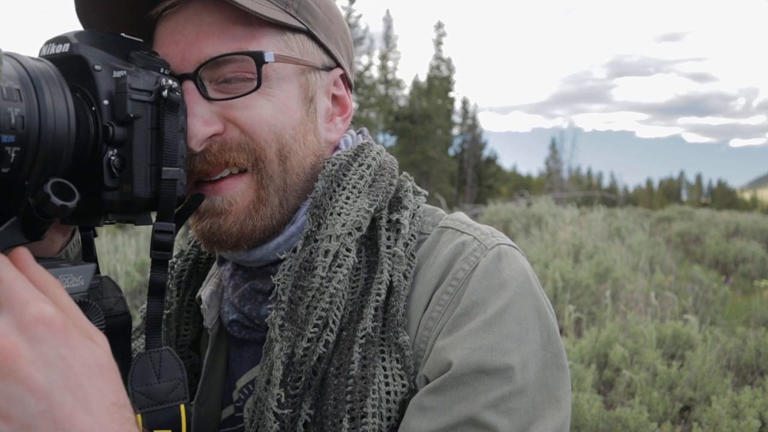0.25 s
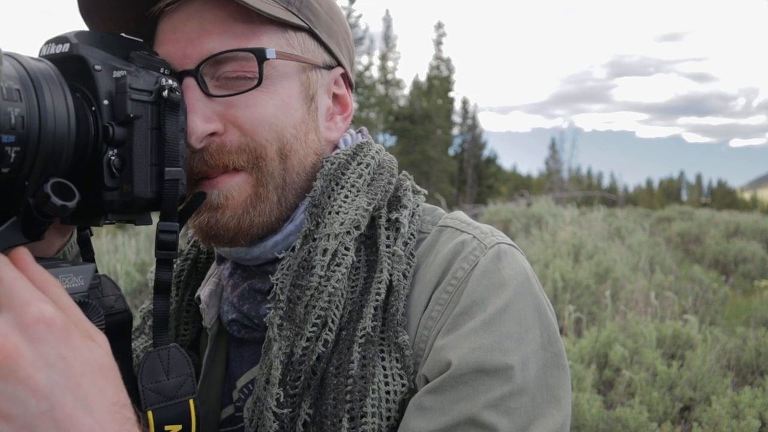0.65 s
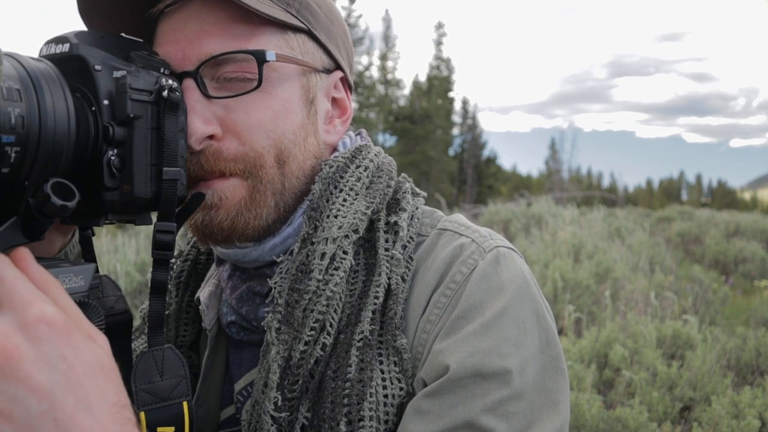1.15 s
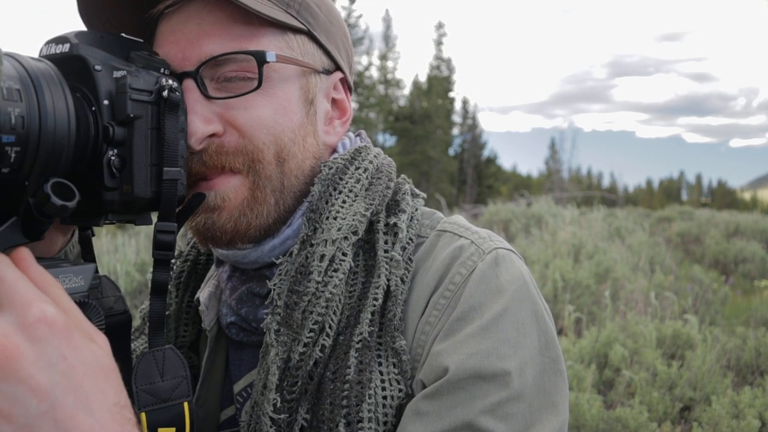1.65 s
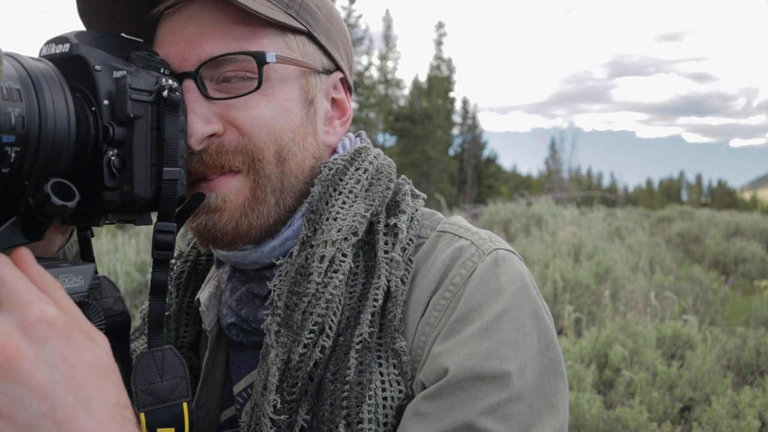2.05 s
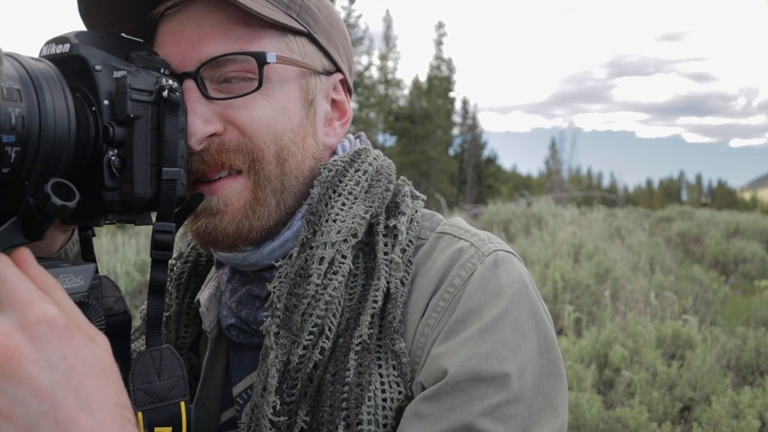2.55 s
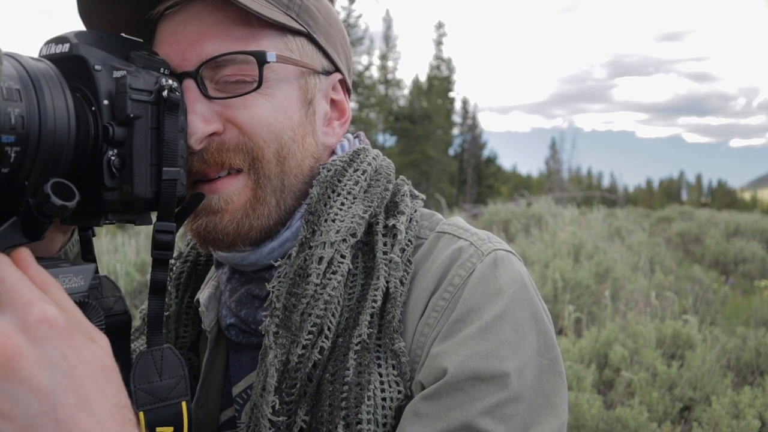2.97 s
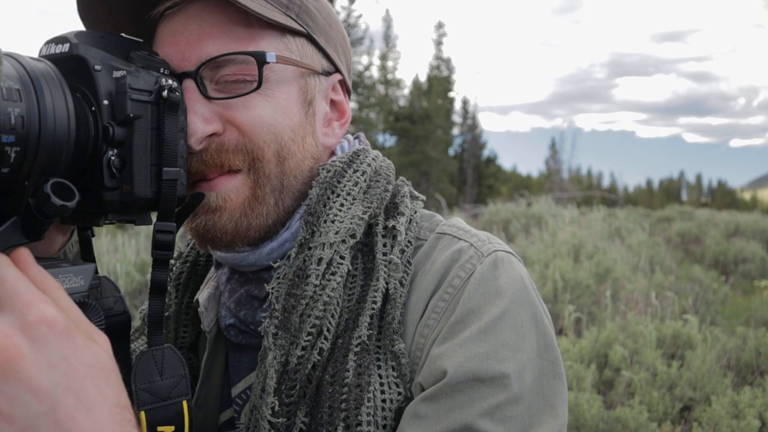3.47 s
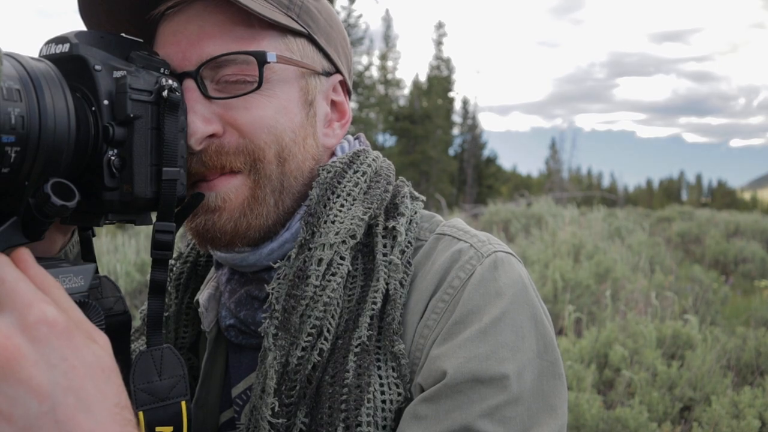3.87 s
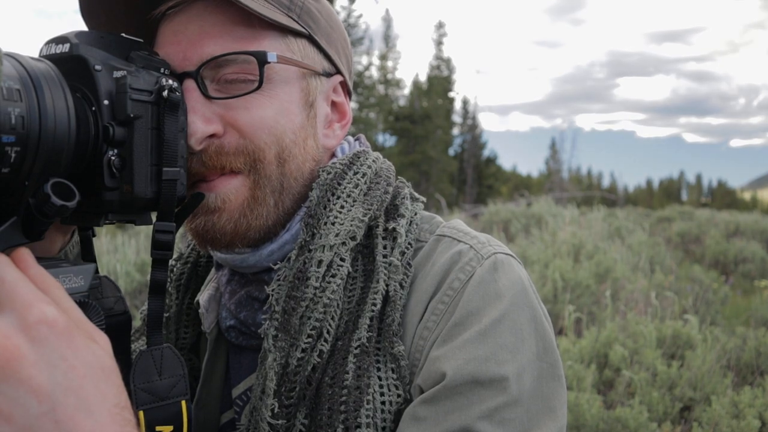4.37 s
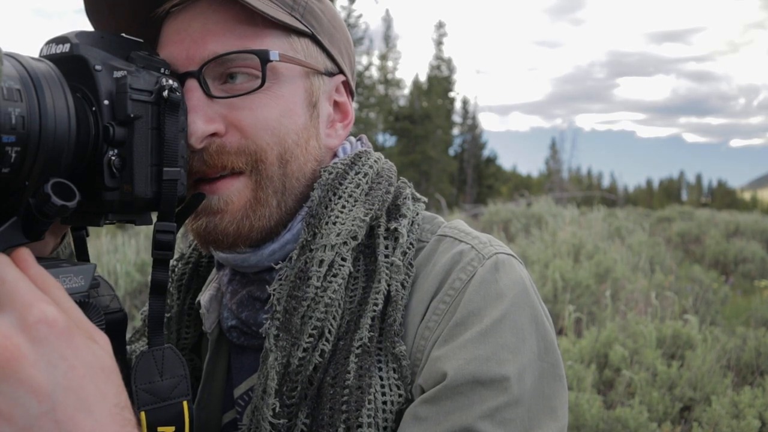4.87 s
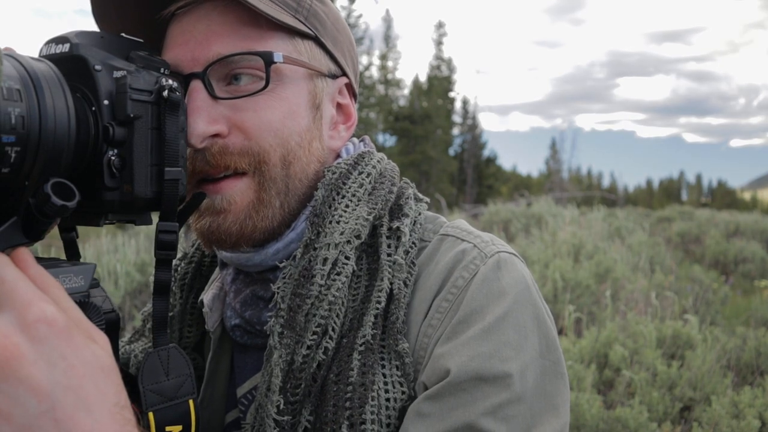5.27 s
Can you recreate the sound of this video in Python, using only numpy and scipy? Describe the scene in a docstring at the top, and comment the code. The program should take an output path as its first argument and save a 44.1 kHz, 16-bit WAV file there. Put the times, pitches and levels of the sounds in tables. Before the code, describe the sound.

Five sharp shutter actuations dominate: a pair at the very start, the first already under way, a pair just before and after two seconds, and a single near three and a half. Between them a few tiny grip ticks, faint bird trills, whistles and buzzing notes, and low far traffic that slowly recedes. Dry, close, centred mono pickup outdoors with no room echo.

```python
"""A reflex camera close by in an open meadow starts mid-frame, then fires at once, twice more, and once again.
In each frame the mirror swings up, the curtains slap across, a motor winds and the mirror drops: bursts of
tiny impacts through resonances. Small birds, sung as bending sines, go from trills through twitter, pips
and whistles to long buzzes. Filtered noise and sine drones make the far traffic throughout, over a faint
even hiss. Both channels carry the same signal."""
import sys
import numpy as np
from scipy import signal
from scipy.fft import rfft, irfft
from scipy.io import wavfile
from scipy.ndimage import uniform_filter1d

SR = 44100
rng = np.random.default_rng(int(sys.argv[2]) if len(sys.argv) > 2 else 0)


def digitize_waveform(pressure):
    """Quantize a signal to 16-bit integers and store it at the path in sys.argv[1].

    Rows of a 2-D input are taken as channels; values are limited to [-1, 1].
    """
    field = np.atleast_2d(pressure).T
    bounded = np.clip(field, -1, 1)
    quanta = np.round(bounded * 32767).astype(np.int16)
    wavfile.write(sys.argv[1], SR, quanta)


N = 243431
TIME = np.arange(N) / SR

# Stages of a frame in order. Each entry: stage name, share of its rattle energy that repeats every frame (0-1).
STAGE_REPEAT = {"mirror up": .5, "aperture": .3, "exposure": .98, "motor": .3, "mirror down": .4, "bounce":
                .3, "settle": .3, "lever": .4, "latch": .4}
# Resonances of the shutter frame, excited by the curtains only.
# Each row: centre in Hz, width in Hz, lift in dB.
SHUTTER_MODES = [(505, 80, 5.5), (1052, 65, 3.8), (1388, 50, 7), (1610, 80, 3), (1715, 80, 4),
                 (2065, 80, 8), (2235, 80, 4), (2530, 90, 4.5), (3128, 80, 5), (3316, 80, 6),
                 (3750, 110, 3), (4122, 100, 3), (4650, 80, 5), (5470, 100, 4), (7700, 120, 4),
                 (7990, 130, 3), (8410, 150, 4), (9140, 150, 4), (13470, 250, 5)]


def from_db(db):
    """Decibels to amplitude ratio."""
    return 10 ** (np.asarray(db) / 20)


def rms_one(x):
    """Scales a signal to rms 1."""
    return x / np.sqrt(np.mean(x ** 2) + 1e-20)


def add(track, s, sound):
    """Mixes a sound in at s seconds; what falls outside is dropped."""
    at = round(s * SR) + np.arange(len(sound))
    inside = (at >= 0) & (at < N)
    track[at[inside]] += sound[inside]


def drift(rate_hz, size=N):
    """Smooth chance with a spread near 1: random points, rate_hz per second, joined by lines."""
    steps = np.arange(size) * rate_hz / SR
    return np.interp(steps, np.arange(size), rng.standard_normal(size))


def swell(loudest_s, length_s):
    """A bell-shaped rise and fall, 1 at its top, 1/e at length_s to either side."""
    return np.exp(-((TIME - loudest_s) / length_s) ** 2)


def response(spectrum, modes=(), size=8192):
    """Causal impulse response of unit energy: a broad colour with ringing peaks on it."""
    hz = np.maximum(np.fft.rfftfreq(size, 1 / SR), 1)
    points_hz, points_db = np.transpose(spectrum)
    colour_db = np.interp(np.log(hz), np.log(points_hz), points_db)
    # folding the cepstrum gives minimum phase
    cepstrum = irfft(np.log(from_db(colour_db)))
    cepstrum[1:size // 2] *= 2
    cepstrum[size // 2 + 1:] = 0
    gain = np.exp(rfft(cepstrum))
    for centre_hz, width_hz, lift_db in modes:
        resonance = 1 / (1 + 1j * (hz ** 2 - centre_hz ** 2) / (hz * width_hz))
        gain = gain * (1 + (from_db(lift_db) - 1) * resonance)
    impulse = irfft(gain)
    return impulse / np.linalg.norm(impulse)


def coloured(x, spectrum, modes=()):
    """A signal heard through a colour and its resonances."""
    return signal.fftconvolve(x, response(spectrum, modes))[:N]


def noise(spectrum):
    """Steady noise of a given colour, rms 1."""
    white = rng.standard_normal(N)
    gain = np.abs(rfft(response(spectrum), N))
    return rms_one(irfft(rfft(white) * gain, N))


def camera():
    """Curtains ring in the shutter frame; mirror, levers and motor ring in the camera body."""
    # Resonances of the camera body. Each row: centre in Hz, width in Hz, lift in dB.
    body_modes = [(467, 45, 4.5), (950, 99, 0), (1033, 74, 5), (1354, 71, 2), (1453, 50, 0.5),
                  (1825, 76, -1), (1990, 110, 2.5), (2700, 84, 1.5), (3190, 160, 4), (3850, 120, 2),
                  (4280, 100, 3.5), (5520, 250, 4), (7660, 120, 4.5), (8300, 170, 2.5), (11500, 300, -0.5),
                  (14050, 300, -1)]
    # Cushioned slaps of the two curtains. Each row: delay after the exposure begins in s, pitch in Hz,
    # width in Hz, peak in dB before the frame rings.
    slaps = [(.002, 1290, 635, -16.8), (.00785, 1500, 750, -24.5)]
    out = clatter(contacts(["exposure"]), SHUTTER_MODES)
    other_stages = set(STAGE_REPEAT) - {"exposure"}
    out += clatter(contacts(other_stages) + motor(stage_starts("motor")), body_modes)
    for s in stage_starts("exposure"):
        for delay_s, hz, width_hz, db in slaps:
            add(out, s + delay_s, from_db(db) * slap(hz, width_hz))
    return out


def stage_starts(stage):
    """When a stage begins in each frame, in s."""
    # Each row is a frame: start in s of mirror up, aperture, exposure, motor, mirror down, bounce, settle,
    # lever, latch.
    frames = [(-0.2, -0.158, -0.112, -0.092, -0.0235, -0.009, 0.002, 0.0168, 0.0268),
              (0.1322, 0.1735, 0.21905, 0.2395, 0.3075, 0.3213, 0.332, 0.3463, 0.3586),
              (1.7472, 1.7885, 1.834, 1.854, 1.9214, 1.9355, 1.9443, 1.9585, 1.9734),
              (2.0632, 2.1043, 2.1501, 2.1698, 2.2387, 2.2525, 2.262, 2.276, 2.2896),
              (3.4027, 3.4433, 3.4899, 3.5105, 3.570, 3.590, 3.5945, 3.6068, 3.6277)]
    return np.transpose(frames)[list(STAGE_REPEAT).index(stage)]


def contacts(stages):
    """Parts that strike or slide in the given stages, each timed in every frame."""
    # Each row: stage, delay in s, dull knock in dB, bright click in dB, casing ring in Hz, part ring in Hz,
    # lift of the part ring in dB, rise in s, knock t60 in s.
    strikes = [("mirror up", -.004, -34, -49, 1240, 3700, 6.6, 0.00087, 0.028),
               ("mirror up", 0, -31, -24.5, 1960, 2760, 9.4, 0.00051, 0.011),
               ("mirror up", .0018, -28.5, -41, 2020, 5430, 14, 0.0012, .022),
               ("mirror up", 0.0082, -35.5, -33, 530, 4240, 13, 0.00094, 0.021),
               ("mirror up", .0088, -25, -25, 1034, 3120, 6.3, 0.00051, 0.012),
               ("mirror up", .0142, -34, -38, 850, 3500, 11, .0006, 0.023),
               ("mirror up", .0208, -38.5, -47, 930, 3100, 7.3, .0005, 0.04),
               ("aperture", -.0045, -35, -51, 1640, 4500, 8, .001, 0.018),
               ("aperture", 0, -38.5, -34.5, 1810, 5650, 8.1, 0.00023, 0.012),
               ("aperture", 0.0054, -46, -44.5, 790, 9100, 10, .0008, 0.026),
               ("exposure", .0006, -19, -39, 1400, 3960, 4.3, 0.00015, 0.0072),
               ("exposure", 0.002176, -22, -17.5, 1600, 3300, 4.4, 0.00018, 0.004),
               ("exposure", .0042, -41.5, -26, 2065, 9100, 5, 0.00052, 0.011),
               ("exposure", 0.0061, -29, -18, 1660, 7900, 5.2, 0.00076, 0.015),
               ("exposure", 0.0056, -30.5, -21, 1320, 7400, 7.5, 0.00023, 0.0092),
               ("motor", -0.00064, -31, -31, 1470, 3010, 7, 0.0013, 0.022),
               ("motor", .003, -39, -36, 1870, 5300, 7, 0.00092, 0.018),
               ("motor", 0.0063, -30.5, -36, 560, 8440, 7.2, 0.00062, 0.025),
               ("mirror down", -.0024, -52, -35, 1100, 6400, 7.4, .001, 0.019),
               ("mirror down", 0, -51, -26, 1300, 4100, 5.4, 0.00066, .011),
               ("mirror down", .0054, -41, -24.5, 1480, 4110, 7.9, 0.00038, 0.01),
               ("bounce", 0, -47, -38, 1800, 4300, 9.1, 0.0006, 0.014),
               ("settle", 0, -46, -40.5, 1600, 2300, 12, 0.0008, 0.025),
               ("lever", 0, -44.5, -35, 1030, 5340, 11.6, .0005, 0.018),
               ("lever", .0035, -34.5, -38.5, 2045, 2660, 15.5, .0005, 0.018),
               ("latch", 0, -36.5, -35.5, 1410, 2870, 14.4, 0.00034, 0.0097),
               ("latch", .004, -39, -49, 840, 6600, 6.7, .0004, 0.026),
               ("latch", 0.023, -52, -57, 1300, 3010, 10, .0005, 0.012)]
    return [(stage_starts(stage) + delay_s, STAGE_REPEAT[stage], *blow)
            for stage, delay_s, *blow in strikes if stage in stages]


def motor(starts, cam_turns=3):
    """The cocking motor winds: its cam ticks in pairs and its gear teeth chatter, lighter as the load eases."""
    casing_hz, gear_ring_hz, cam_ping_hz = 1400, 3220, 5700
    cam_delay_s, cam_period_s, cam_pair_s, cam_t60_s = .0212, .0108, .0043, .016
    cam_knock_db, cam_click_db, ease_db_per_s = -37.5, -36.5, 62
    gear_run_s, gear_tooth_s, gear_t60_s = .108, .0032, .014
    gear_knock_db, gear_click_db = -41, -48
    # cam and teeth roll into contact and ring a little
    rise_s, lift_db = 0.00039, 3
    out = []
    for turned_s in cam_period_s * np.arange(cam_turns):
        eased_db = ease_db_per_s * turned_s
        for lag_s in (0, cam_pair_s):
            out.append((starts + cam_delay_s + turned_s + lag_s, 0,
                        cam_knock_db - eased_db, cam_click_db - eased_db,
                        casing_hz, cam_ping_hz, lift_db, rise_s, cam_t60_s))
    for turned_s in np.arange(0, gear_run_s, gear_tooth_s):
        eased_db = ease_db_per_s * turned_s
        play_s = gear_tooth_s * rng.uniform(-0.485, .5, len(starts))
        out.append((starts + turned_s + play_s, 0,
                    gear_knock_db - eased_db, gear_click_db - eased_db,
                    casing_hz, gear_ring_hz, lift_db, rise_s, gear_t60_s))
    return out


def clatter(blows, modes, click_decay_share=0.86):
    """Every frame runs through the same contacts, each a knock and a click heard through the resonances."""
    # Colour of knocks on the casing. Each row: frequency in Hz, relative density in dB per Hz.
    knock_colour = [(100, -44), (220, -26), (320, -14.5), (570, -14.5), (760, -7), (900, -2.5),
                    (1400, -2.5), (2050, -2.5), (2400, -6), (3200, -12), (6000, -30), (16000, -50)]
    # Colour of clicks of small metal parts. Each row: frequency in Hz, relative density in dB per Hz.
    click_colour = [(200, -37), (1000, -7.5), (2200, -4), (3300, 0.5), (4300, -1.5), (5000, -3),
                    (6800, -4.5), (8600, -3), (10200, -12), (12000, -11.5), (14000, -7), (16000, -19)]
    knocks, clicks = np.zeros((2, N))
    for starts, alike, dull_db, bright_db, casing_hz, ring_hz, ring_db, rise_s, t60_s in blows:
        click_t60_s = t60_s * click_decay_share
        # part of each rattle is set by the mechanism and repeats; the rest is chance
        habit = np.array([rattle(t60_s, rise_s), rattle(click_t60_s, rise_s)])
        for s in starts:
            chance = np.array([rattle(t60_s, rise_s), rattle(click_t60_s, rise_s)])
            dull, bright = np.sqrt(alike) * habit + np.sqrt(1 - alike) * chance
            add(knocks, s, from_db(dull_db) * part(dull, casing_hz, width_hz=100, lift_db=6.5))
            add(clicks, s, from_db(bright_db) * part(bright, ring_hz, width_hz=217, lift_db=ring_db))
    return coloured(knocks, knock_colour, modes) + coloured(clicks, click_colour, modes)


def rattle(t60_s, rise_s=.00045, grain_db=6.0, size=2048, passes=2):
    """One contact: a quickly dying shower of tiny impacts that feeds all pitches about evenly."""
    t = np.arange(size) / SR
    impacts = rng.choice([-1, 1], size) * from_db(grain_db * drift(1441, size=size))
    fade = (1 - np.exp(-t / rise_s)) * from_db(-60 * t / t60_s)
    # flatten the spectrum
    for _ in range(passes):
        power = uniform_filter1d(np.abs(rfft(impacts * fade)) ** 2, size=11)
        impacts = irfft(rfft(impacts) / np.sqrt(power + 1e-12))
    # the spring behind a contact delivers the same energy for a given fade
    burst = impacts * fade
    return burst * np.linalg.norm(fade) / np.linalg.norm(burst)


def part(blow, hz, width_hz, lift_db):
    """A lever, a blade or a spot on the casing rings briefly at a pitch of its own."""
    b, a = signal.iirpeak(hz, hz / width_hz, fs=SR)
    return blow + (from_db(lift_db) - 1) * signal.lfilter(b, a, blow)


def slap(hz, width_hz, size=2048):
    """Cushioned stop of a curtain: a hollow knock of a few cycles that leaves the shutter frame ringing."""
    t = np.arange(size) / SR
    envelope = (t ** 2 * np.exp(-np.pi * width_hz * t)) ** 2
    knock = envelope / envelope.max() * np.sin(2 * np.pi * hz * t)
    for mode in SHUTTER_MODES:
        knock = part(knock, *mode)
    return knock


def handling(t60_s=0.0094):
    """Small dry ticks from the grip: short rattles through a bright colour."""
    # Each row: start in s, level in dB.
    ticks = [(2.0525, -46), (2.533, -43.5), (4.805, -48), (4.84, -54)]
    # Each row: frequency in Hz, relative density in dB per Hz.
    tick_colour = [(1000, -30), (4000, -14), (6000, 5), (9000, 3), (14000, 2), (16000, -13)]
    out = np.zeros(N)
    for s, db in ticks:
        add(out, s, from_db(db) * rattle(t60_s))
    return coloured(out, tick_colour)


def birds(scatter_db=-16.0, scatter_t60_s=0.38):
    """All bird song, plus its scatter by the trees: convolution with decaying noise."""
    trees = rng.standard_normal(SR // 2) * from_db(-60 * TIME[:SR // 2] / scatter_t60_s)
    direct = trills() + twitter() + whistles_and_pips() + buzzes()
    scattered = signal.fftconvolve(direct, trees / np.linalg.norm(trees))[:N]
    return direct + from_db(scatter_db) * scattered


def whistle(length_s, pitches_hz, flutter_hz, size=22050):
    """One bird note bending through three pitches; fast flutter turns it into a buzz."""
    along = np.minimum(np.arange(size) / SR / length_s, 1)
    bend_hz = np.polyval(np.polyfit([0, .5, 1], pitches_hz, 2), along)
    hz = bend_hz + flutter_hz * drift(600, size=size)
    return np.sin(np.pi * along) * np.sin(2 * np.pi * np.cumsum(hz) / SR)


def trills():
    """Runs of sliding chips that start softly and vary a little in level and pitch."""
    # Each row: first chip in s, last chip in s, period in s, chip length in s, start in Hz, end in Hz,
    # flutter in Hz.
    runs = [(0.688, 1.70, .0822, .026, 5170, 4780, 40), (1.06, 1.66, .0828, .013, 3600, 5900, 400),
            (0.398, 1.05, .0695, .018, 3900, 3450, 330)]
    # Level of each run in dB, before the soft start.
    run_levels_db = [-63, -64.5, -64]
    out = np.zeros(N)
    for run, db in zip(runs, run_levels_db):
        first_s, last_s, period_s, length_s, start_hz, end_hz, flutter_hz = run
        for s in np.arange(first_s, last_s, period_s):
            effort_db = -5 * np.exp(-(s - first_s) / .2) + rng.normal(0, .8)
            pitches_hz = np.array([start_hz, (start_hz + end_hz) / 2, end_hz]) + rng.normal(0, 25, 3)
            chip = whistle(length_s, pitches_hz, flutter_hz, size=2000)
            add(out, s, from_db(db + effort_db) * chip)
    return out


def twitter():
    """Paired falling chips, each sung with two voices, growing louder."""
    start_s, end_s, period_s, pair_s = 2.324, 3.35, .1243, .05
    voices_hz, chip_s, fall_hz = (5300, 4870), 0.019, 170
    start_db, growth_db_per_s = -71.5, 4
    out = np.zeros(N)
    for s in np.arange(start_s, end_s, period_s):
        gain = from_db(start_db + growth_db_per_s * (s - start_s))
        for hz in voices_hz:
            pitches_hz = hz + fall_hz * np.array([.5, 0, -.5])
            chip = gain * whistle(chip_s, pitches_hz, flutter_hz=40, size=2000)
            add(out, s, chip)
            add(out, s + pair_s, chip)
    return out


def whistles_and_pips(pip_s=.05):
    """A whistled phrase of bending notes, and short pips of level pitch."""
    # Each row: start in s, length in s, start in Hz, middle in Hz, end in Hz, flutter in Hz, level in dB.
    phrase = [(2.566, .054, 2400, 2530, 2800, 25, -58.5), (2.673, .06, 3250, 3600, 3700, 35, -67),
              (2.735, .05, 3700, 3900, 4500, 35, -67), (2.925, .055, 2900, 3050, 2900, 260, -62.5),
              (2.96, .034, 2950, 2640, 2420, 15, -61), (3.014, .056, 2430, 2980, 3150, 15, -59)]
    # Each row: start in s, pitch in Hz, level in dB.
    pips = [(2.3, 3500, -64.5), (2.335, 4100, -70.5), (2.44, 4060, -71), (2.546, 4080, -73.5),
            (2.965, 4000, -71)]
    out = np.zeros(N)
    for s, length_s, *pitches_hz, flutter_hz, db in phrase:
        add(out, s, from_db(db) * whistle(length_s, pitches_hz, flutter_hz))
    for s, hz, db in pips:
        add(out, s, from_db(db) * whistle(pip_s, (hz, hz, hz), flutter_hz=25))
    return out


def buzzes(pulses_per_s=38, flutter_hz=150):
    """A song of long fluttering notes, pulsed in level; the first ones overlap as two voices."""
    # Each row: start in s, length in s, pitch in Hz, level in dB.
    song = [(3.74, .35, 4480, -70.5), (3.7, .42, 4730, -72.5), (4.06, .42, 4300, -70.5),
            (4.1, .26, 4700, -74), (4.42, .24, 4250, -73), (4.64, .18, 3800, -69), (4.83, .27, 3760, -69.5),
            (5.06, .15, 3810, -67.5), (5.31, .26, 4720, -73.5)]
    out = np.zeros(N)
    for s, length_s, hz, db in song:
        note = whistle(length_s, (hz, hz, hz), flutter_hz)
        pulse_phase = np.pi * pulses_per_s * TIME[:len(note)] + drift(12, size=len(note))
        add(out, s, from_db(db) * note * np.abs(np.sin(pulse_phase)))
    return out


def traffic(waver_db=0.62):
    """Far road: receding roar, tyre noise and rumble that swell with each car, hiss swells and engine drones."""
    # Cars passing. Each row: loudest in s, 1/e half-length in s, tyre noise in dB.
    passing_cars = [(0.0, 0.51, -50.5), (0.605, 0.62, -53.5), (1.775, 0.59, -54.5), (2.385, 0.39, -53.5)]
    # Swells of a far hiss. Each row: loudest in s, 1/e half-length in s, level in dB.
    hiss_swells = [(0.936, 0.28, -62), (5.026, 0.45, -62.5)]
    # Colours of roar, tyres, rumble and hiss. Each row: frequency in Hz, relative density in dB per Hz.
    roar_colour = [(100, -11), (250, -12), (350, -11.5), (500, -5.5), (750, -3.5), (1000, -0.5), (1300, -4),
                   (1700, -9), (2100, -13.5), (2800, -23), (5000, -63)]
    tyre_colour = [(100, -17), (300, -21.5), (550, -13), (750, -9), (900, 1.5), (1050, -3.5), (1250, -9),
                   (1800, -15), (4000, -44.5)]
    rumble_colour = [(15, -41), (30, -33), (50, -2.5), (70, 1), (100, 3), (130, -14), (250, -22),
                     (600, -49)]
    hiss_colour = [(500, -32), (1000, -27), (1300, -3), (1700, 4), (2200, -8), (3000, -26), (6000, -33)]
    roar_db, recede_db_per_s = -54.5, 0.15
    rumble_db, car_rumble_db = -70.5, -24  # the second is relative to the tyre noise
    cars = np.sqrt(sum((from_db(db) * swell(loudest_s, length_s)) ** 2
                       for loudest_s, length_s, db in passing_cars))
    out = from_db(roar_db - recede_db_per_s * TIME + waver_db * drift(19)) * noise(roar_colour)
    out += cars * from_db(waver_db * drift(17)) * noise(tyre_colour)
    out += np.hypot(from_db(rumble_db), from_db(car_rumble_db) * cars) * noise(rumble_colour)
    hiss = sum(from_db(db) * swell(loudest_s, length_s) for loudest_s, length_s, db in hiss_swells)
    out += hiss * noise(hiss_colour)
    return out + engine_drones()


def engine_drones(wander_hz=2.99, waver_db=2):
    """Engine drones: sines that wander in pitch and waver in level as they swell and fade."""
    # Each row: loudest in s, 1/e half-length in s, mean pitch in Hz, peak amplitude in dB before the waver.
    drones = [(2.6, 1.85, 178, -69.5), (3.2, 1.75, 157, -71.5), (1.2, 2.4, 56, -67), (0.81, 0.59, 84, -64)]
    out = np.zeros(N)
    for loudest_s, length_s, hz, db in drones:
        phase = 2 * np.pi * np.cumsum(hz + wander_hz * drift(8)) / SR
        out += from_db(db + waver_db * drift(5.65)) * swell(loudest_s, length_s) * np.sin(phase)
    return out


def even_hiss(level_db=-66.0):
    """A faint even hiss: steady coloured noise."""
    # Each row: frequency in Hz, relative density in dB per Hz.
    air_colour = [(20, -2), (300, 5.5), (2000, 0.5), (3500, 2), (5000, 0.5), (8000, -2.5), (12600, -3.5),
                  (13300, -34), (16000, -42)]
    return from_db(level_db) * noise(air_colour)


def scene():
    """The camera in front, the meadow behind; the same signal in both channels."""
    mono = camera() + handling() + birds() + traffic() + even_hiss()
    return np.stack([mono, mono])


def record(dry):
    """A steep elliptic low-pass cuts the top."""
    cutoff_hz, ripple_db, stop_db = 16000, .2, 80
    return signal.sosfilt(signal.ellip(10, ripple_db, stop_db, cutoff_hz, fs=SR, output="sos"), dry)


dry = scene()
out = record(dry)
digitize_waveform(out)
```